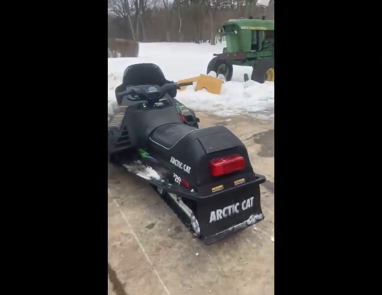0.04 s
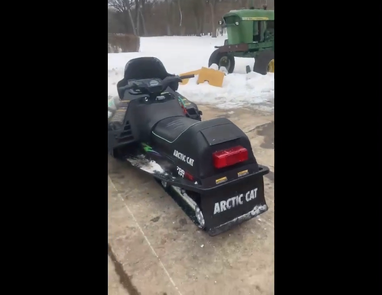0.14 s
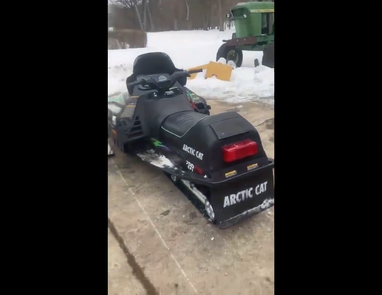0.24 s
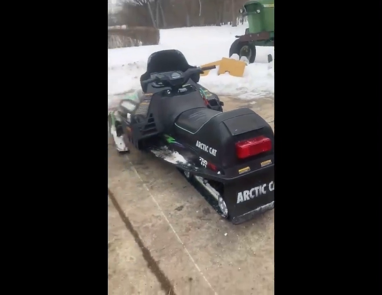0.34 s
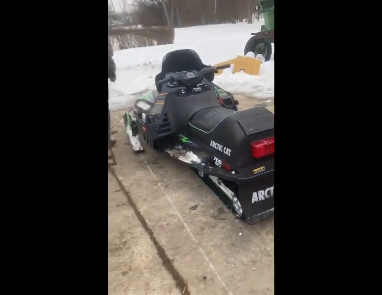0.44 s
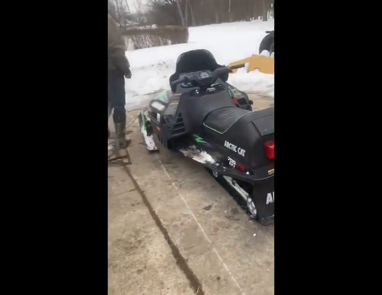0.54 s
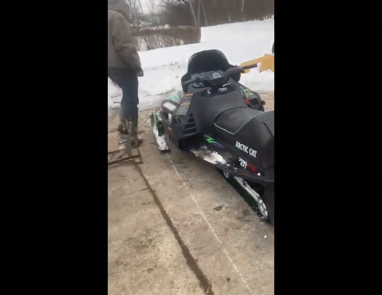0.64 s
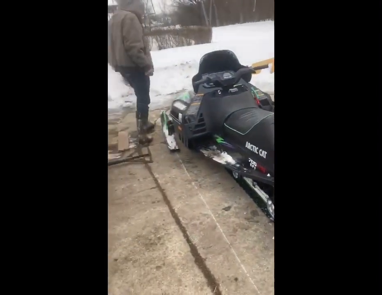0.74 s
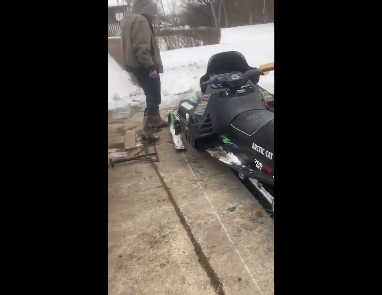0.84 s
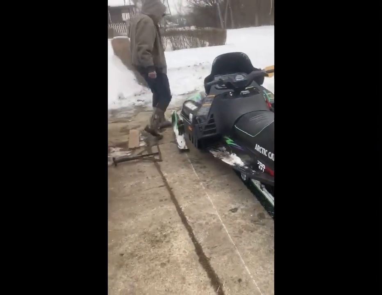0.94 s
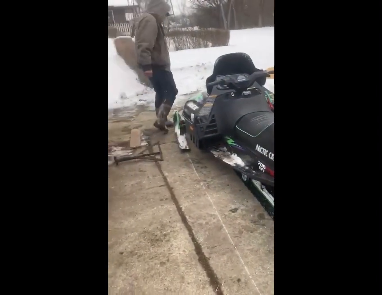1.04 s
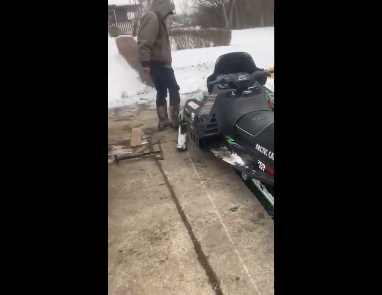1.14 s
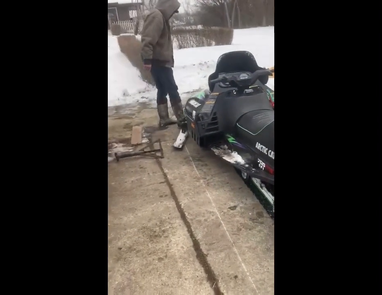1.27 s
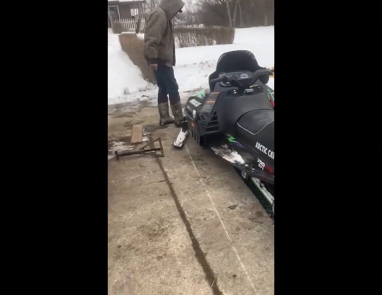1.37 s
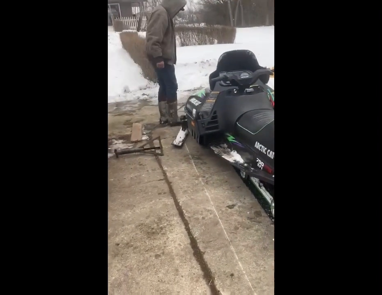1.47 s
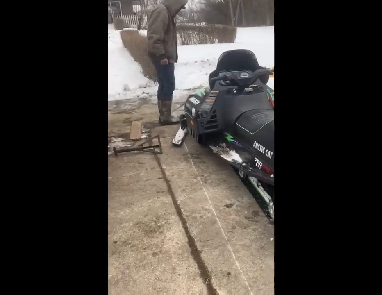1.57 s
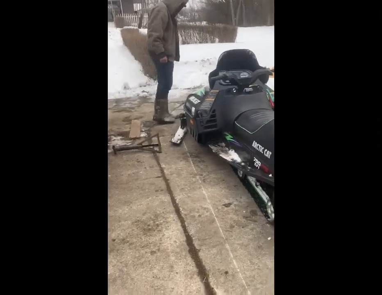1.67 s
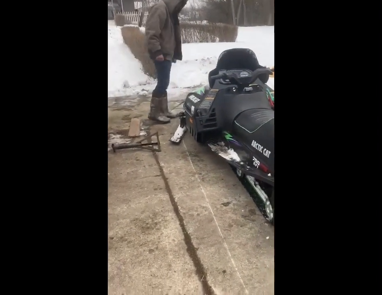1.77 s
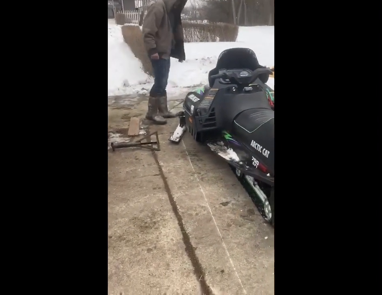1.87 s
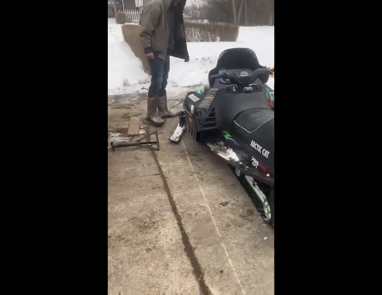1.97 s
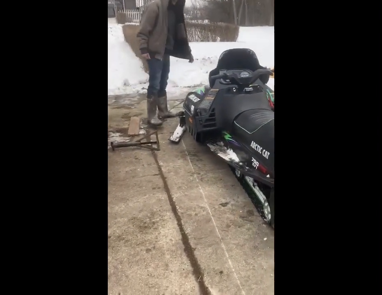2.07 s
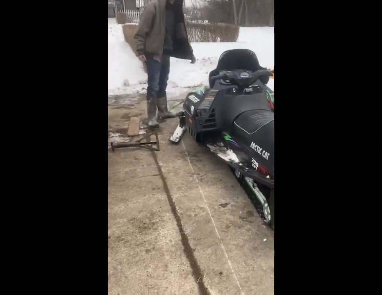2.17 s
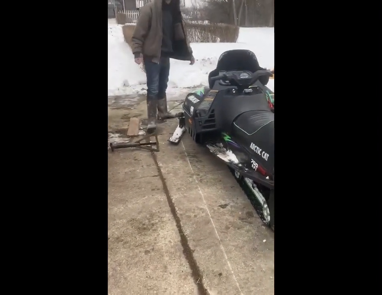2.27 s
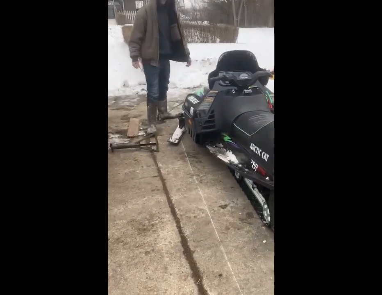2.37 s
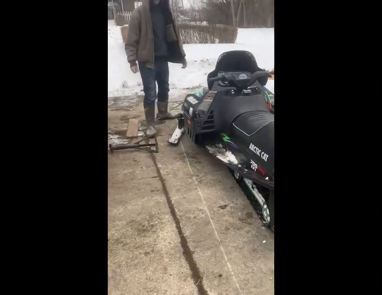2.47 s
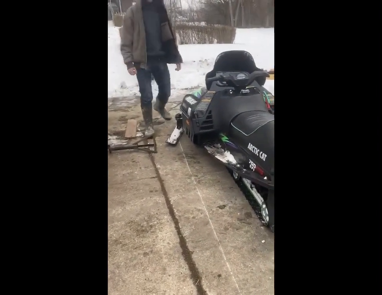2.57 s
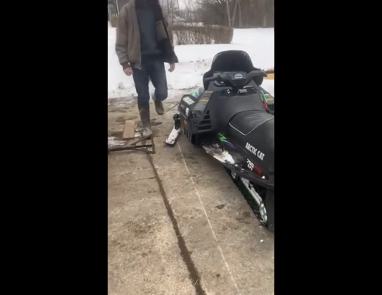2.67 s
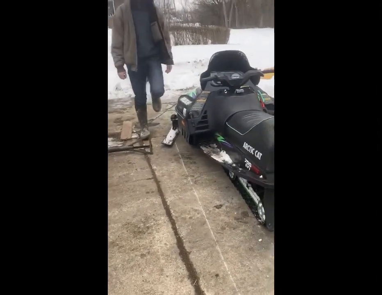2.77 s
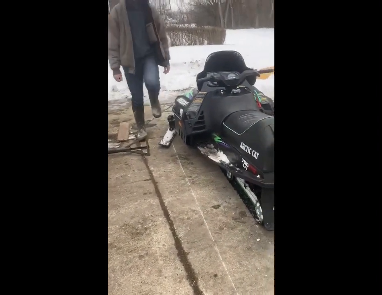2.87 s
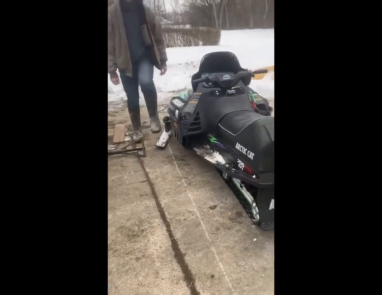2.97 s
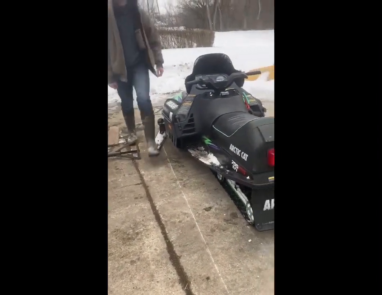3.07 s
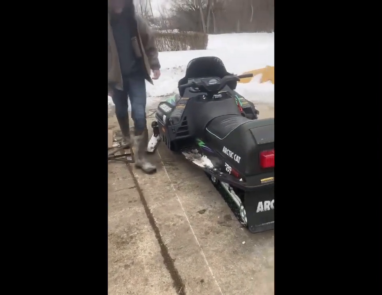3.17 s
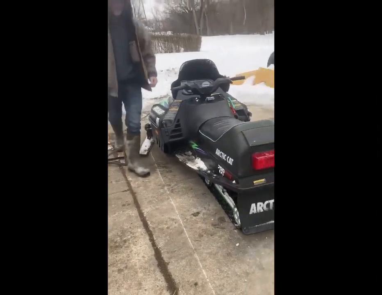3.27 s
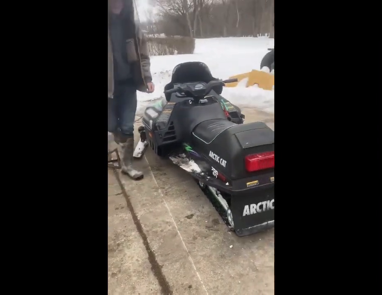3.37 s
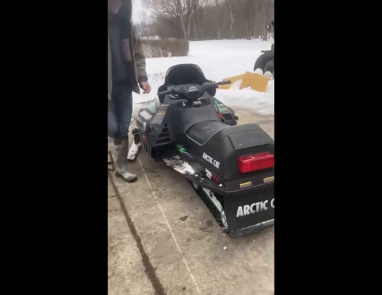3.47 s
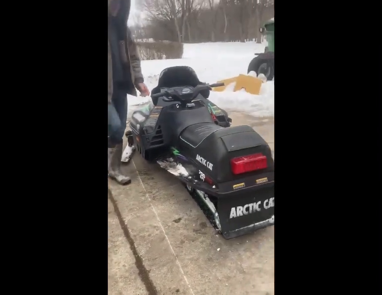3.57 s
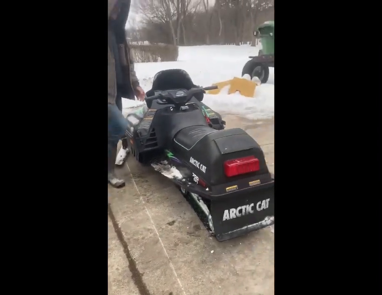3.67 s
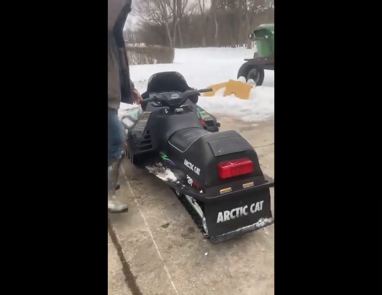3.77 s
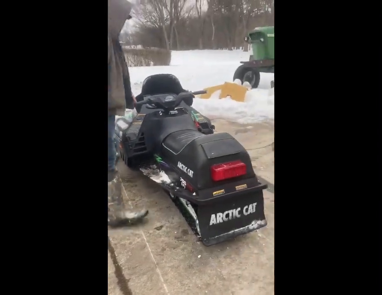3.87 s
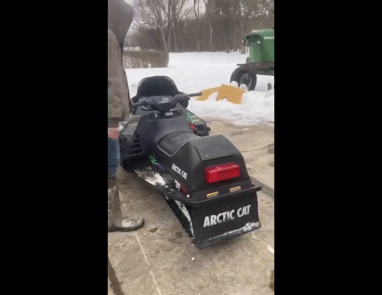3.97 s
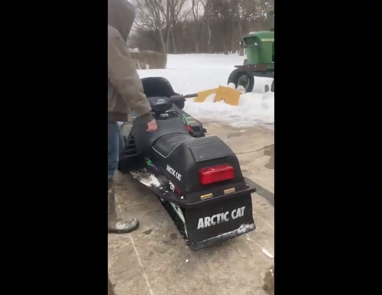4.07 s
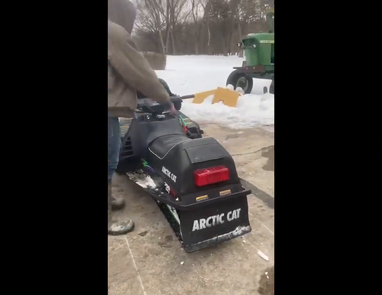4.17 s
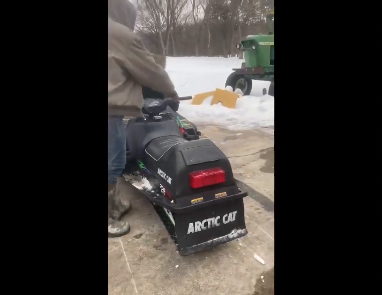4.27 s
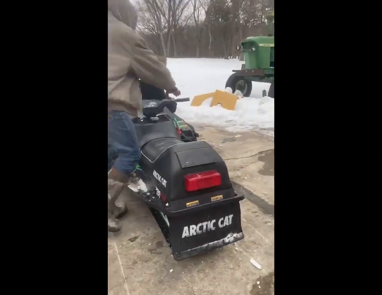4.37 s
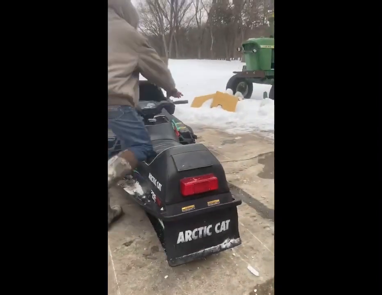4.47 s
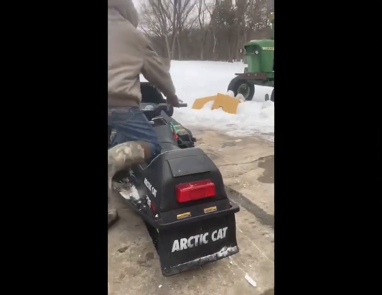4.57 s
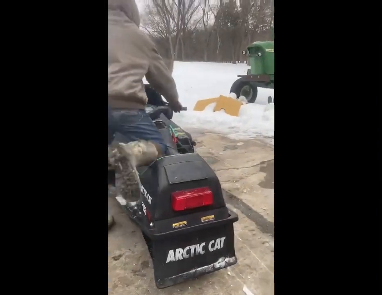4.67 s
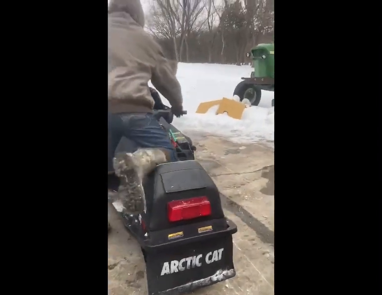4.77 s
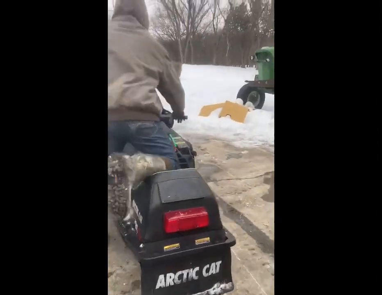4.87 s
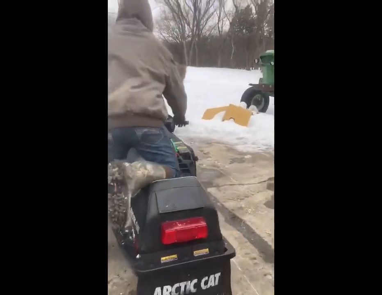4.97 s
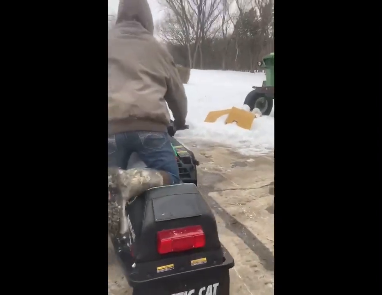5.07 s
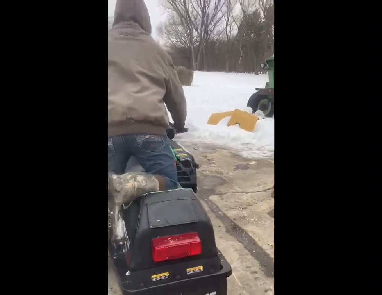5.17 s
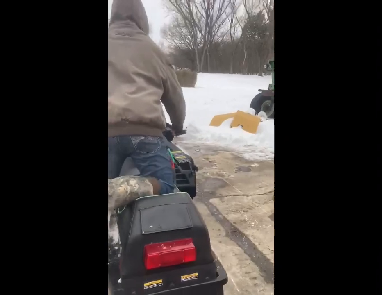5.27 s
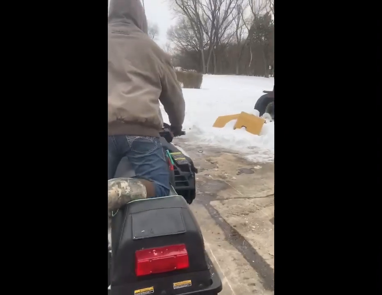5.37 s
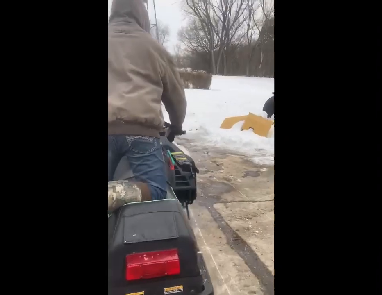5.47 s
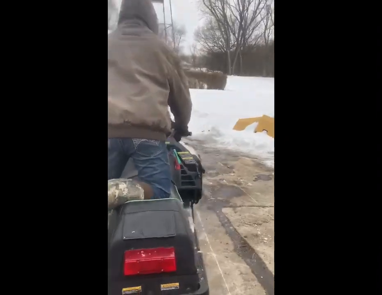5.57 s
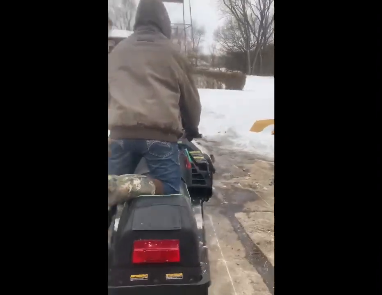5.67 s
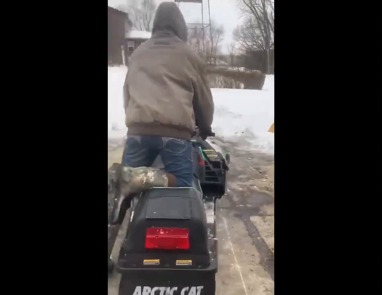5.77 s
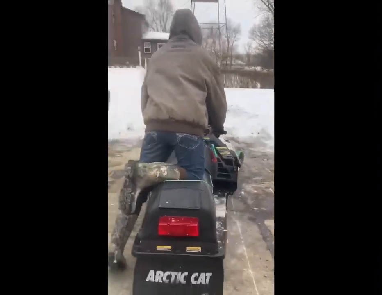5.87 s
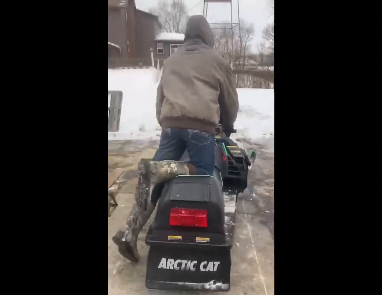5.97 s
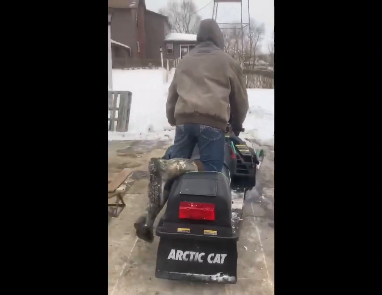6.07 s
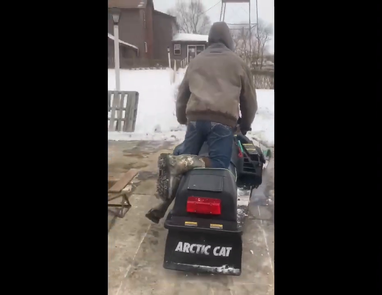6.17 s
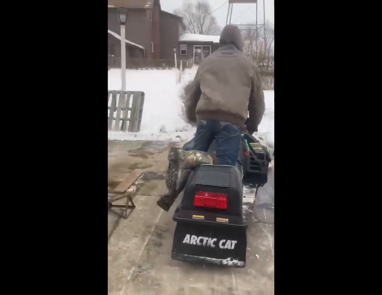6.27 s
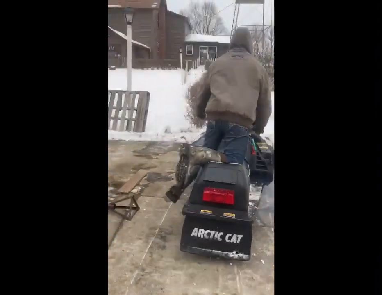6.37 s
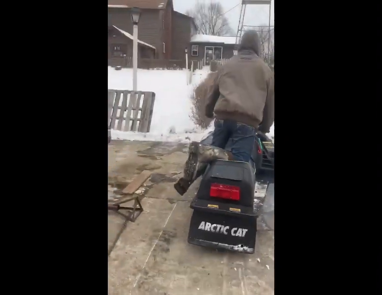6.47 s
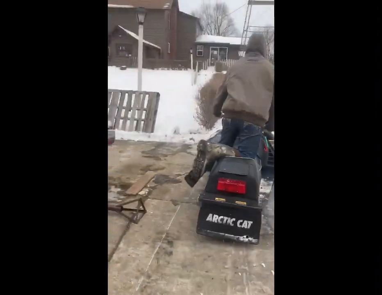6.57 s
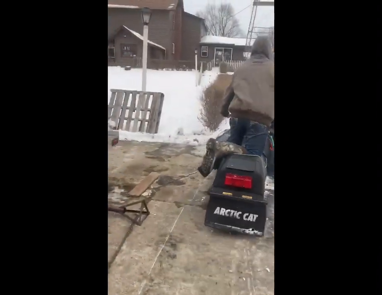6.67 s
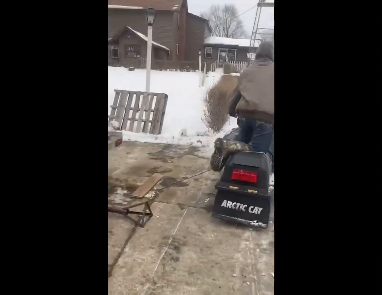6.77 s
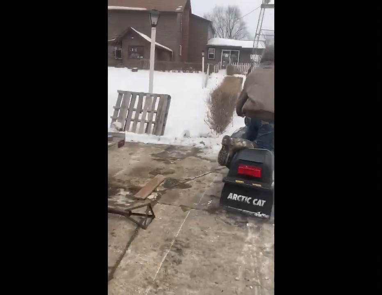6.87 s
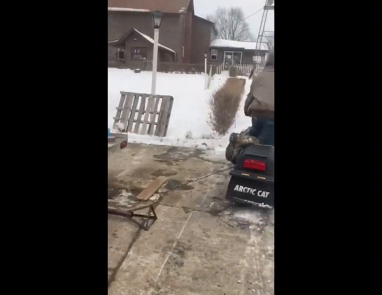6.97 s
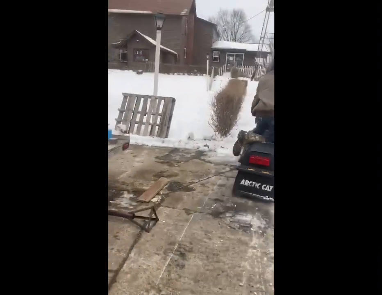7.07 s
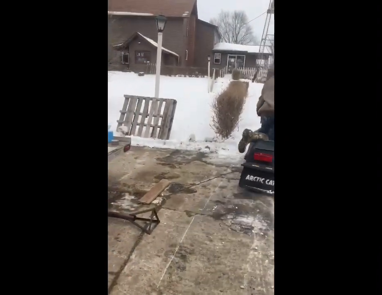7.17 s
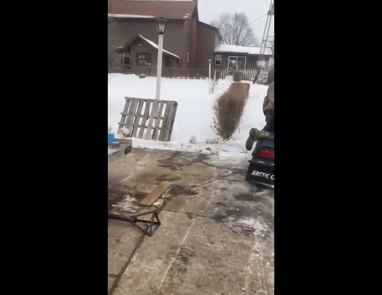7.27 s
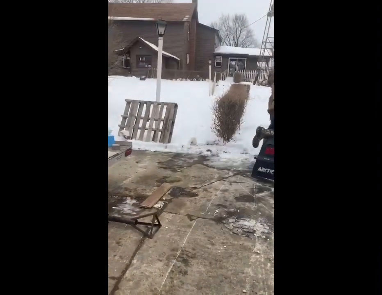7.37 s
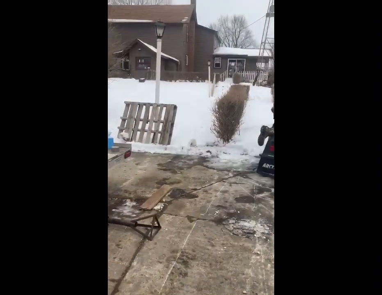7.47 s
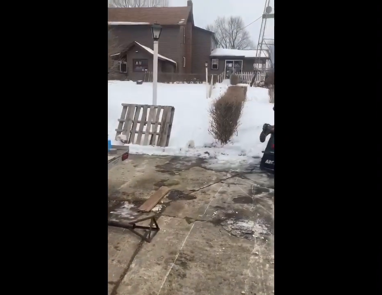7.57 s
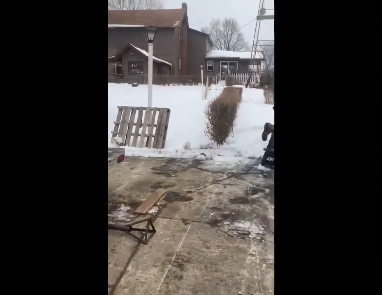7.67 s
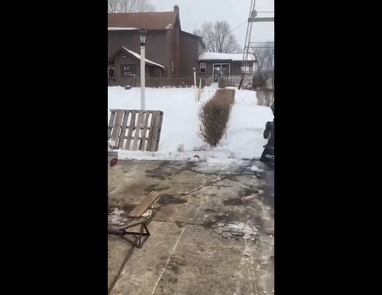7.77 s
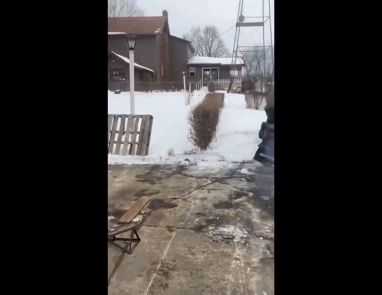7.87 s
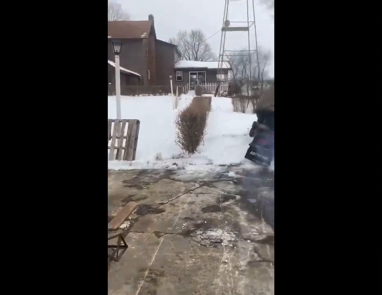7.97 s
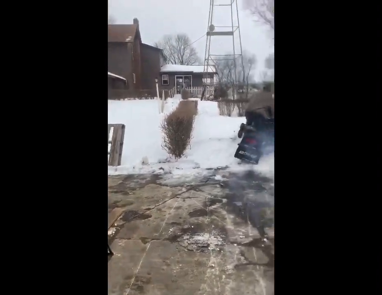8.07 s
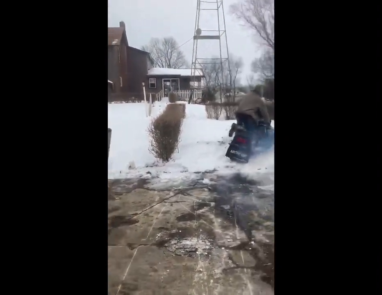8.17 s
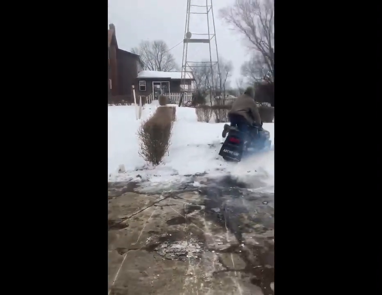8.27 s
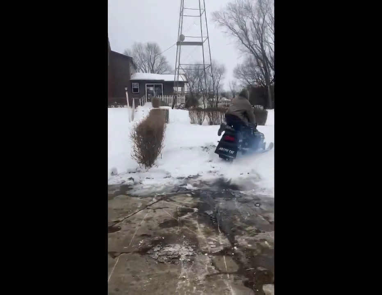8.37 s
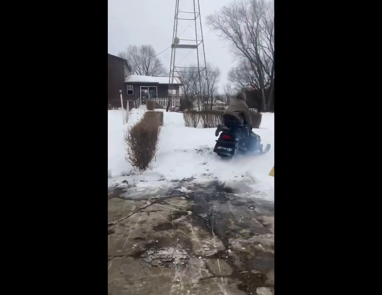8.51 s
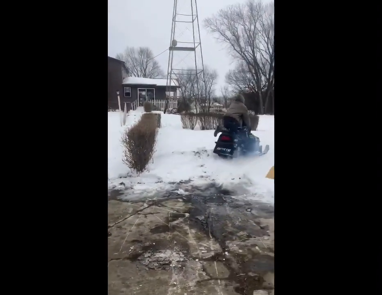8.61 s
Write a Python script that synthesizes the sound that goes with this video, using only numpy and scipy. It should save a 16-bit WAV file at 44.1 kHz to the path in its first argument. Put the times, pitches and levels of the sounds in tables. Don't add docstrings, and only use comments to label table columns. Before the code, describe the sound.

Rough, crackling small-engine idle close by, sudden singing throttle blips with backfiring pops, then a raspy buzz receding over light rumble and wind.

```python
import sys
import numpy as np
from scipy import signal
from scipy.fft import rfft, irfft
from scipy.io import wavfile
from scipy.ndimage import uniform_filter1d

SR = 44100
rng = np.random.default_rng(int(sys.argv[2]) if len(sys.argv) > 2 else 0)


def to_wav(sig):
    pcm = np.clip(np.atleast_2d(sig), -1, 1) * 32767
    pcm = np.round(pcm).astype(np.int16)
    wavfile.write(sys.argv[1], SR, pcm.T)


def voltage_ratio(level):
    return 10 ** (np.asarray(level, float) / 20)


N = 381024
CLOCK = np.arange(N) / SR

# time in seconds, port openings in Hz.
SPEED = [(4.6, 74.54), (4.95, 78.25), (5.17, 123.3), (5.32, 166.4), (5.4, 183.5), (5.63, 124.6),
         (5.77, 103.8), (5.87, 99.6), (6.03, 126), (6.24, 141.9), (6.33, 134.7), (6.46, 116.7),
         (6.63, 139.7), (6.9, 121.8), (7.13, 115), (7.45, 119.6), (7.9, 117.1), (8.25, 120), (8.64, 131.9)]
# time in seconds, opening from 0 to 1.
THROTTLE = [(0, .0), (4.0, 0.09), (4.9, 0.2), (5.0, 0.62), (5.13, 0.77), (5.38, 0.63), (5.5, .05),
            (5.86, 0.32), (6.0, 0.58), (6.24, 0.53), (6.36, 0.4), (6.45, 0.4), (6.53, 0.54), (6.7, 0.5),
            (7.1, 0.47), (7.9, 0.12), (8.45, 0.09), (8.64, 0.1)]
IDLE_HZ, CREEP_HZ_PER_S, SETTLE_HZ, SETTLE_AT_S, SETTLE_S = 84, .8, 5.6, 2.8, .25
NEAR_M, LEAVES_S, AWAY_M_PER_S = 2.25, 6.31, 1.76

# time in seconds, crack in dB.
IDLE_POPS = [(.659, -17), (.696, -14.5), (.745, -21.5), (.941, -17.5), (1.001, -15), (1.158, -14),
             (1.498, -18.5), (2.57, -18), (1.206, -13.5), (1.43, -15), (1.551, -12), (1.647, -15.5),
             (1.698, -11.5), (1.794, -8), (1.854, -11.5), (1.892, -13), (1.968, -20), (2.013, -11),
             (2.075, -13), (2.136, -11.5), (2.695, -14.5), (2.988, -9.5), (3.027, -11.5), (3.088, -14.5),
             (3.143, -14), (3.246, -8.5), (3.394, -14.5), (3.527, -10), (3.552, -20), (3.657, -16),
             (3.8, -19), (3.901, -21), (3.973, -13), (4.476, -11.5), (4.637, -11), (4.82, -6.5)]
# first and last burn in seconds, first and last crack in dB.
BURN_RUNS = [(0.047, 0.193, -17, -18.5), (0.239, 0.306, -16.5, -17), (0.36, 0.426, -17, -14.5),
             (0.527, 0.597, -15, -13), (0.795, 0.862, -19, -13), (1.039, 1.111, -15.5, -19),
             (1.307, 1.385, -13.5, -14), (2.232, 2.604, -12, -11), (2.731, 2.885, -12, -10),
             (3.35, 3.433, -10, -11), (3.616, 3.773, -9, -4), (3.854, 3.934, -11.5, -14.5),
             (4.035, 4.119, -10.5, -4.5), (4.199, 4.359, -8.5, -6.5), (4.439, 4.598, -10.5, -9.5),
             (4.678, 4.76, -8, -8), (4.865, 4.948, -13, -5.5)]
OPENINGS_PER_BURN = 6
# time in seconds, crack in dB.
RIDING_POPS = [
    (4.998, -10),
    (5.046, -12.5),
    (5.402, -13),
    (5.462, -12.5),
    (5.504, -16.5),
               (5.572, -11.5), (5.65, -16), (5.697, -9.5), (5.771, -23), (5.831, -6.5), (5.864, -18.5),
             (5.900, -4), (5.996, -7.5), (6.03, -19), (6.32, -12.5), (6.397, -8), (6.458, -11.5),
             (6.563, -12.5), (6.747, -16.5), (6.966, -11.5), (7.029, -12), (7.096, -14.5), (7.144, -35),
             (7.171, -10.5), (7.214, -30), (7.24, -13), (7.292, -11.5), (7.334, -17.5), (7.376, -13),
             (7.42, -19.5), (7.835, -20.5), (7.911, -14), (8.034, -26), (8.116, -18), (8.164, -23)]
# time in seconds, half length in seconds, depth of the hole in dB.
MISSES = [(5.435, .01, -5), (6.299, 0.013, -8.5), (6.379, 0.015, -7.5), (6.44, 0.0089, -7.5),
          (7.009, 0.013, -8), (7.084, 0.011, -6.5), (7.136, 0.0076, -12), (7.204, .007, -12),
          (7.321, .006, -6), (7.413, .009, -1.5), (7.477, 0.0066, -7)]

# dB at idle, dB more at full throttle, dB per octave of speed, share of the distance loss.
BARK_LAW, RASP_LAW = (-32, 7, 3.5, 0.7), (-34.5, 14.5, 5, 0.38)
GAS_LAW, SNARL_LAW = (-56.5, 18, 10.5, -0.02), (-57.5, 33.5, 10.5, 2)
SONG_LAW, SHAKE_LAW = (-37.5, 22.5, 6, 2.14), (-23.5, 10.5, -2, .5)
BURNT_SHARE, SCATTER_DB, WEAK_CYLINDER_DB = (.99, .86, .99), (1.5, 2.2, 1), (-1.5, -2, -1.5)
THUMP_LAG_S, PUFF_S = .0042, .016

# Hz, width in Hz, level in dB.
BARK = [(247, 57, -6), (292, 51, -0.5), (413, 58, 3.5), (496, 70, 2)]
BARK_DRIFT = [1.7, 0.5, 0.3, -2.5]
# Hz, width in Hz, level in dB.
THUMP = [(95, 120, -12.5), (180, 63, -14), (200, 110, -9.5), (308, 230, -1.5), (381.6, 84, 8.5),
         (458, 75, -3.5)]
# Hz, width in Hz, level in dB.
CRACK = [(813, 29, 1.5), (1073, 45, -3.5), (1480, 170, -0.5), (1575, 105, 6), (2042, 39, -14.5),
         (738, 77, -4.5), (500, 81, -4.5)]
CRACK_DRIFT = [0, -1.5, 0, -0.29, 0, 2.1, -2]
# Hz, density in dB per Hz.
RASP = [(260, -37.5), (450, -19), (547, -1), (675, -14), (771, -4), (880, -7.5), (960, -8), (1250, -5.5),
        (1400, -6.5), (1550, -6.5), (1670, -11), (1820, -8), (2900, -35.5), (3770, -41.5), (6380, -120)]
# Hz, density in dB per Hz.
GAS = [(1500, -63), (2200, -24.5), (2600, 3), (3050, -3), (3500, -7), (4000, -5.5), (4500, -6),
       (5000, -10.5), (5400, -18), (6100, -18), (6900, -22), (7500, -40.5), (10000, -30.5), (15000, -40.5)]
# Hz, width in Hz, level in dB.
SNARL = [(780, 77, 2), (1620, 71, -6.5), (1806, 200, 7), (1940, 150, -4)]
PIPE_ECHO_S, PIPE_ECHO_DEPTH = .0021, 1.7

# time in seconds, level in dB.
DRONE = [(0, -24.5), (2.4, -26.5), (3.3, -37.5), (4.9, -27), (5.0, -15), (5.11, -7.5), (5.22, -16.5),
         (5.27, -26), (5.34, -21), (5.42, -26), (5.85, -40), (5.93, -17), (6.0, -12), (6.14, -14.5),
         (6.22, -36), (6.4, -20), (6.52, -12), (6.63, -23), (6.9, -24), (7.2, -28.5), (7.5, -35),
         (7.95, -40), (8.08, -31.5), (8.3, -28.5), (8.64, -22.5)]
DRONE_LAG_S = 0.005935
# multiple of the opening rate, dB at idle,
# dB more at full throttle, dB per second, waver in dB.
HALF_TONES = [(1.5, -35.5, 1.5, 1.14, 4), (2, -25.5, -2, 0.18, 1.5), (2.5, -38.5, -0.5, 1.8, 4.5),
              (3, -34, 1, -0.22, -0.5)]
# Hz, level in dB.
SONG = [(150, -16.5), (230, -10.5), (300, 4), (360, -4), (425, -2), (490, -10), (550, -8), (670, -18.5),
        (790, -4.5), (950, -14), (1150, -15), (1350, -27.5), (1560, -15.5), (1850, -12.5), (2100, -29.5)]
SONG_HALF_DB, SONG_WAVER_DB = -10.5, 2.5

# time in seconds, peak in dB, left minus right in dB, ring in Hz.
CLACKS = [
    (5.695, -16.5, -0.5, 2280),
    (6.0333, -21, 2.5, 2290),
    (7.0708, -26.5, 6, 2230),
    (8.333, -24, -1, 1830),
]
# Hz, width in Hz, level in dB.
CLUTCH = [(1700, 1100, -2), (3370, 1700, -3), (4570, 810, -9.5), (6300, 1000, -15), (6800, 280, -25)]
# Hz, width in Hz, level in dB.
BELT = [(5570, 1200, 3), (4380, 500, -22.5)]
BELT_FROM_S, BELT_DB = 5.84, -49.5
# Hz, width in Hz, level in dB.
TRACK = [(68, 45, 3.5), (191, 62, -2)]
TRACK_FROM_S, TRACK_DB = 6.6, -29
# time in seconds, Hz, level in dB.
TAIL = [
    (5.3, 1567, -60),
    (5.38, 1559, -22.5),
    (5.5, 1560, -24.5),
    (5.55, 1554, -58),
    (7.75, 1512, -59),
    (7.95, 1532, -43.5),
    (8.64, 1537, -38),
]
# time in seconds, level in dB.
THUDS = [
    (5.465, -8.5),
    (5.583, -16),
    (5.657, -15),
    (5.705, -9.5),
    (5.738, -11.5),
]
# Hz, width in Hz, level in dB.
THUD = [(90, 60, -4), (190, 90, 0), (290, 110, -2)]

# Hz, density in dB per Hz.
RUMBLE = [(12, -50), (20, -22), (59, -8), (97, -5.5), (125, -9), (160, -14), (200, -14), (292, -24),
          (420, -17), (500, -20), (650, -55), (1100, -120)]
ECHO_T60_S = .2
# Hz, left minus right in dB.
PORT_DB = [(60, .8), (210, .3), (450, 2), (600, -.5), (950, 3), (1320, 6.5), (1700, 3.5), (2500, 2),
           (3500, 0), (7000, .5)]
# Hz, lead of the left in radians.
PORT_RAD = [(0, 0), (260, .1), (520, .3), (780, 1.1), (1030, 1.3), (1450, .2), (2050, 1.2), (2450, -.8),
            (2750, -3), (3800, -2.6), (4300, -1), (4950, .2), (5150, -3), (6300, -2.2), (7000, -2.8)]
MIC_LOW_HZ, MIC_HIGH_HZ = 72.6, 6730
# Hz, density in dB per Hz.
AIR = [(6000, -58), (7500, -6), (10000, -10.5), (10600, -13), (10900, -5), (11150, -3.5), (11400, -17.5),
       (12800, -33), (13500, -16.5), (15000, -17.5)]


def speed():
    settled = (1 + np.tanh((CLOCK - SETTLE_AT_S) / SETTLE_S / 2)) / 2
    idle = IDLE_HZ - CREEP_HZ_PER_S * CLOCK - SETTLE_HZ * settled
    return np.where(CLOCK < SPEED[0][0], idle, uniform_filter1d(curve(SPEED)[0], size=1500))


def idle_burns():
    rows, hz = list(IDLE_POPS), speed()
    for first, last, first_db, last_db in BURN_RUNS:
        count = round((last - first) * hz[int(first * SR)] / OPENINGS_PER_BURN) + 1
        rows += zip(np.linspace(first, last, count), np.linspace(first_db, last_db, count))
    return sorted(rows)


def port_openings():
    turns = np.cumsum(speed()) / SR
    pop_times = np.transpose(idle_burns())[0]
    slip = np.unwrap(np.interp(pop_times, CLOCK, turns), period=1)
    waver = np.interp(CLOCK, pop_times, uniform_filter1d(slip, size=5))
    turns -= uniform_filter1d(waver, size=12000)
    return np.interp(np.arange(np.ceil(turns[0]), turns[-1]), turns, CLOCK)


def loss_db():
    away_m = AWAY_M_PER_S * np.maximum(CLOCK - LEAVES_S, 0)
    return -20 * np.log10(1 + away_m / NEAR_M)


def effort(idle_db, open_db, octave_db, share):
    octaves = np.log2(speed() / IDLE_HZ)
    return voltage_ratio(idle_db + open_db * curve(THROTTLE)[0] + octave_db * octaves + share * loss_db())


def misses():
    return voltage_ratio(sum(db * np.exp(-((CLOCK - s) / half) ** 4) for s, half, db in MISSES))


def exhaust():
    at = port_openings()
    throttle = np.clip(at_times(curve(THROTTLE)[0], at), 0, 1)
    share, scatter_db, weak_db = (np.where(at < SPEED[1][0], idle, shut + (full - shut) * throttle)
                                  for idle, shut, full in (BURNT_SHARE, SCATTER_DB, WEAK_CYLINDER_DB))
    chance = rng.standard_normal((2000, 4))[:len(at)].T
    at = at + .00008 * scatter_db * chance[0]
    size = voltage_ratio(scatter_db * chance[1] + weak_db * (np.arange(len(at)) % 2))
    pump = np.convolve(train(at + THUMP_LAG_S, size), np.hanning(72), "same")
    burns = 1 / (1 + np.exp(-1.7 * chance[2])) < share
    burnt = train(at, burns * voltage_ratio(scatter_db * chance[3]))
    puffs = .25 + steady(fade(burnt, PUFF_S))

    drive = unit(pump) + .35 * unit(puffs * rng.standard_normal(N))
    bark = sum(idle_drift(drift) * ring(drive, [mode]) for mode, drift in zip(BARK, BARK_DRIFT))
    bangs = (.6 + 1.6 * curve(THROTTLE)[0] ** 2) * unit(colour(spread(burnt), RASP))
    rush = unit(colour(puffs * hiss(.92), RASP))
    rasp = effort(*RASP_LAW) * steady(bangs + rush)
    gas = effort(*GAS_LAW) * steady(colour(puffs * hiss(.8), GAS))
    snarl = effort(*SNARL_LAW) * unit(ring(burnt, SNARL))
    return effort(*BARK_LAW) * unit(bark) + misses() * (rasp + gas + snarl)


def pops():
    at, crack_db = np.transpose(idle_burns() + RIDING_POPS)
    later = at + 1 / at_times(speed(), at)
    listed = np.abs(later[:, None] - at).min(axis=1) < .004
    follow_db = -2.5 - 1.6 * at + 2 * rng.standard_normal(200)[:len(at)] - 60 * listed
    at, crack_db = np.r_[at, later], np.r_[crack_db, crack_db + follow_db]
    hits = train(at, voltage_ratio(np.minimum(crack_db, .5 * crack_db - 7)))

    puff = uniform_filter1d(fade(hits, .009), size=160, origin=79)
    front = np.convolve(hits, np.hanning(22) / 8, "same")
    modes = []
    for mode, drift in zip(CRACK, CRACK_DRIFT):
        clean = voltage_ratio(-15.5) * ring(front, [mode])
        breathy = voltage_ratio(-8.5) * puff * ring(hiss(0.91), [mode]) / 14
        modes.append(idle_drift(drift) * (clean + breathy))
    modes[0] = modes[0] * voltage_ratio(np.where(CLOCK > 5, -7, 0))
    modes[3] = modes[3] * voltage_ratio(np.where(CLOCK > 5.6, -5, 0))
    crack = sum((-1) ** k * mode for k, mode in enumerate(modes))

    size = voltage_ratio(-18 + 0.1 * at + 0.44 * at_times(loss_db(), at) + 0.77 * (crack_db + 11.0))
    push = train(at + THUMP_LAG_S, size) - 0.5 * train(at + THUMP_LAG_S - .0025, size)
    thump = ring(np.convolve(push, np.hanning(64) / 30, "same"), THUMP)
    gas = uniform_filter1d(fade(hits, .018), size=60, origin=29) * unit(colour(hiss(.85), GAS))
    return crack + thump + voltage_ratio(np.where(CLOCK > 5, -27.0, -32.0)) * gas


def drone():
    at = port_openings() + DRONE_LAG_S
    chance = rng.standard_normal((2000, 5))[:len(at)].T
    swell = [np.interp(CLOCK, at, c) for c in chance]
    turn = 2 * np.pi * np.interp(CLOCK, at, np.arange(len(at)))
    out = voltage_ratio(curve(DRONE)[0] + 3.3 * swell[0]) * np.cos(turn)
    for (multiple, idle_db, open_db, creep_db, waver_db), c in zip(HALF_TONES, swell[1:]):
        slow_db = creep_db * np.minimum(CLOCK, 5) - 1.9 * np.maximum(CLOCK - LEAVES_S, 0)
        gain = effort(idle_db, open_db, -8.0 * (multiple - 1.5), 0.91) * voltage_ratio(slow_db + waver_db * c)
        out = out + gain * np.cos(np.round(2 * multiple) / 2 * turn)
    return 2 ** .5 * out


def song():
    at = port_openings()
    turn, hz = 2 * np.pi * np.interp(CLOCK, at, np.arange(len(at))), speed()
    chance = rng.standard_normal((200, 24)).T
    out = 0
    for k, c in zip(np.r_[4:14, 14:28:2], chance):
        resonance_db = np.interp(k / 2 * hz, *np.transpose(SONG))
        waver_db = SONG_WAVER_DB * np.interp(CLOCK, np.arange(200) / 20, c)
        gain = voltage_ratio(resonance_db + SONG_HALF_DB * (k % 2) + waver_db)
        out = out + gain * np.cos(k / 2 * turn + k * k)
    return effort(*SONG_LAW) * out


def clutch():
    at, peak_db, pan_db, ring_hz = np.transpose(CLACKS)
    size = np.array([voltage_ratio(peak_db + side * pan_db / 2) for side in (1, -1)])
    hits = np.array([train(at, s) for s in size])
    burst = uniform_filter1d(fade(hits, 0.0063), size=120, origin=59)
    knock = 0
    for k, hz in enumerate(ring_hz):
        tone = ring(train(at[[k]] + .002, [1.]), [(hz, 260, 0)])
        strike = np.hanning(40) * np.cos(2 * np.pi * hz * np.arange(40) / SR) / 10
        knock = knock + size[:, [k]] * np.convolve(tone, strike, "same")
    return voltage_ratio(2.5) * burst * unit(ring(hiss(0.45), CLUTCH, -0.84)) + voltage_ratio(4.5) * knock


def belt():
    flicker_db = 4.3 * np.interp(CLOCK, np.arange(400) / 30, rng.standard_normal(400))
    on = np.clip((CLOCK - BELT_FROM_S) / .05, 0, 1)
    return on * voltage_ratio(BELT_DB + 1.5 * loss_db() + flicker_db) * unit(ring(hiss(0.65), BELT))


def track():
    on = np.clip((CLOCK - TRACK_FROM_S) / 0.37, 0, 1)
    rumble = on * voltage_ratio(TRACK_DB) * unit(ring(hiss(0.81), TRACK))
    hz, db = curve(TAIL)
    waver = np.interp(CLOCK, np.arange(600) / 60, rng.standard_normal(600))
    phase = 2 * np.pi * np.cumsum(hz + 16.0 * waver[::-1]) / SR
    whistle = voltage_ratio(db + 4.0 * waver) * np.cos(phase)
    at, thud_db = np.transpose(THUDS)
    thuds = ring(np.convolve(train(at, voltage_ratio(thud_db)), np.hanning(64) / 60, "same"), THUD)
    return rumble + whistle + thuds


def frame_rumble():
    return effort(*SHAKE_LAW) * unit(colour(hiss(1.0), RUMBLE))


def wind():
    return voltage_ratio(-29.0) * unit(ring(hiss(0.084), [(45, 15, 0)]))


def yard(x):
    t = np.arange(SR // 3) / SR
    shared, own = rng.standard_normal(len(t)), rng.standard_normal((2, len(t)))
    low = signal.butter(2, [210, 500], "band", fs=SR)
    high = signal.butter(2, 500, "high", fs=SR)
    tail = signal.lfilter(*low, shared + 0.29 * own[::-1]) + signal.lfilter(*high, own)
    tail = tail * voltage_ratio(-60 * t / ECHO_T60_S) * (t > .012)
    echo = signal.fftconvolve(x, tail / np.sqrt(np.sum(tail[0] ** 2)), axes=1)[:, :N]
    return x + voltage_ratio(-9.5) * echo


def curve(table):
    s, *columns = np.transpose(table)
    return [np.interp(CLOCK, s, c) for c in columns]


def at_times(x, seconds):
    return x[(seconds * SR).astype(int)]


def idle_drift(db_per_s):
    return voltage_ratio(db_per_s * (np.minimum(CLOCK, 5) - 2.5))


def along(table, size=N):
    hz, value = np.transpose(table)
    return np.interp(np.log(np.fft.rfftfreq(size, 1 / SR) + 1), np.log(hz + 1), value)


def colour(x, table):
    return irfft(rfft(x) * voltage_ratio(along(table)), N)


def spread(x):
    hz = np.fft.rfftfreq(N, 1 / SR)
    ripple = np.sin(2 * np.pi * hz * PIPE_ECHO_S) + np.sin(np.pi * 3 ** .5 * hz * PIPE_ECHO_S)
    cycles = 2 * PIPE_ECHO_S * hz - PIPE_ECHO_DEPTH / (2 * np.pi) * ripple
    return irfft(rfft(x) * np.exp(-2j * np.pi * cycles), N)


def unit(x):
    return x / np.sqrt(np.mean(x ** 2))


def steady(x, seconds=0.28):
    power = np.mean(np.atleast_2d(x) ** 2, axis=0)
    return x / np.sqrt(uniform_filter1d(power, int(seconds * SR)) + 1e-12)


def ring(x, modes, sign=1):
    out = 0
    for k, (hz, width, db) in enumerate(modes):
        r, w = np.exp(-np.pi * abs(width) / SR), 2 * np.pi * hz / SR
        mode = signal.lfilter([0, r * np.sin(w)], [1, -2 * r * np.cos(w), r * r], x)
        out = out + sign ** k * voltage_ratio(db) * mode
    return out


def train(seconds, sizes):
    at = np.clip((seconds * SR).astype(int), 0, N - 1)
    return np.bincount(at, sizes, N)


def fade(x, seconds):
    return signal.lfilter([1], [1, -np.exp(-1 / (abs(seconds) * SR))], x)


def hiss(alike):
    shared, own = rng.standard_normal(N), rng.standard_normal((2, N))
    return alike * shared + np.sqrt(1 - alike ** 2) * own


def scene():
    echoed = yard(exhaust() + pops() + clutch() + belt())
    return echoed + drone() + song() + track() + frame_rumble() + wind()


def band_limit(x):
    return signal.sosfilt(signal.butter(12, 15000, fs=SR, output="sos"), x)


def record(dry):
    edge = 4096
    wide = np.pad(dry, ((0, 0), (edge, edge)), "reflect")
    size = wide.shape[1]
    hz = np.fft.rfftfreq(size, 1 / SR)
    band = 1 / np.sqrt((1 + (hz / MIC_HIGH_HZ) ** 16) * (1 + (MIC_LOW_HZ / (hz + 1e-3)) ** 6))
    lean = voltage_ratio(along(PORT_DB, size) / 2) * np.exp(.5j * along(PORT_RAD, size))
    ports = irfft(rfft(wide) * band * np.array([lean, 1 / lean]), size)[:, edge:-edge]
    loudness = np.sqrt(uniform_filter1d(np.mean(ports ** 2, axis=0), size=3000))
    air = voltage_ratio(-66.0) * loudness ** 0.69 * unit(colour(hiss(0.73), AIR))
    rounded = ports / (1 + np.abs(ports / .98) ** 4) ** (1 / 4)
    return band_limit(rounded + air)


dry = scene()
out = record(dry)
to_wav(out)
```